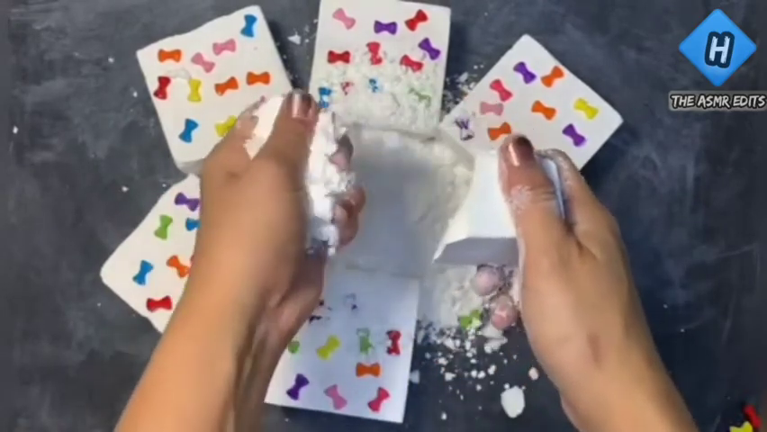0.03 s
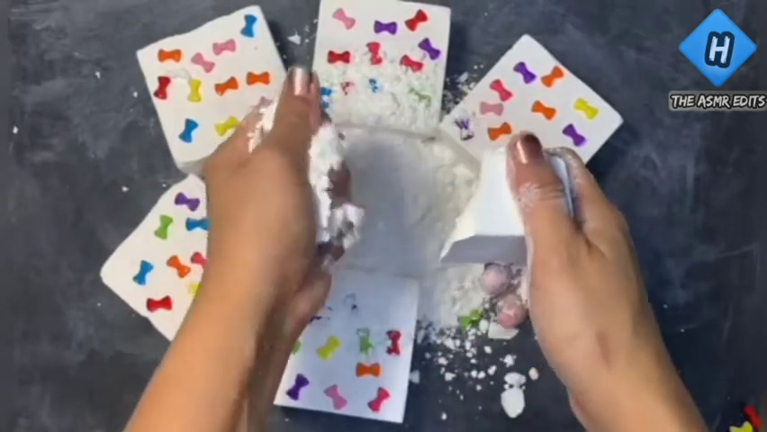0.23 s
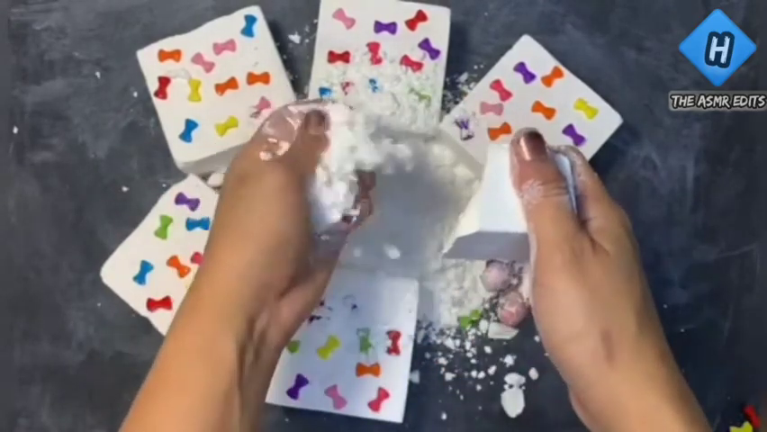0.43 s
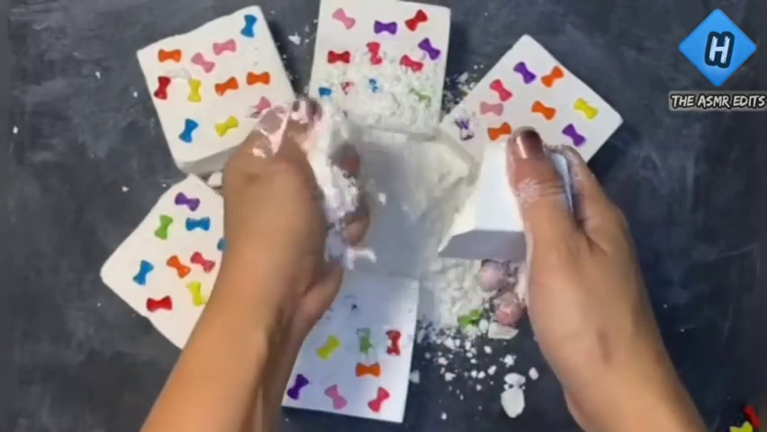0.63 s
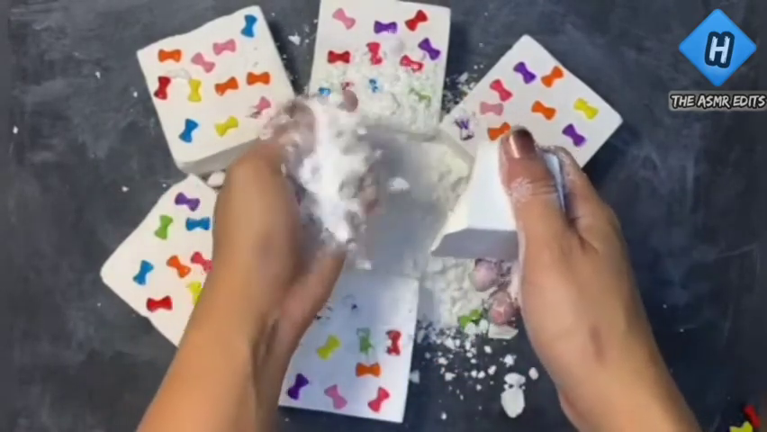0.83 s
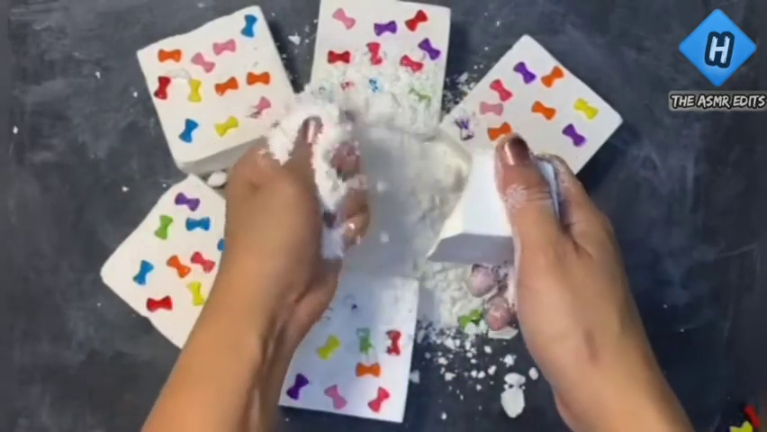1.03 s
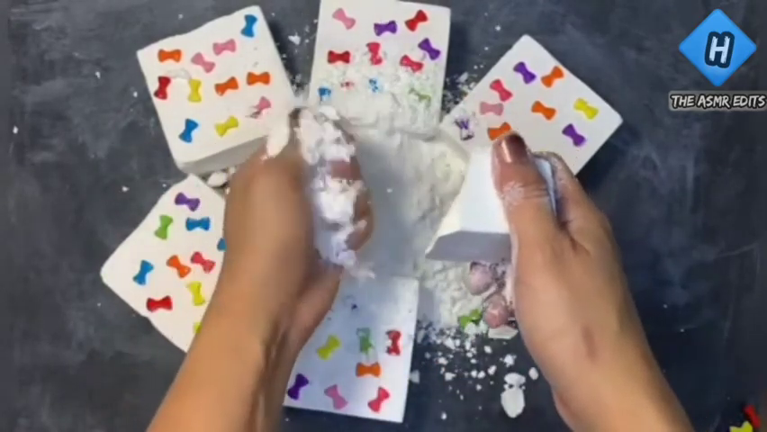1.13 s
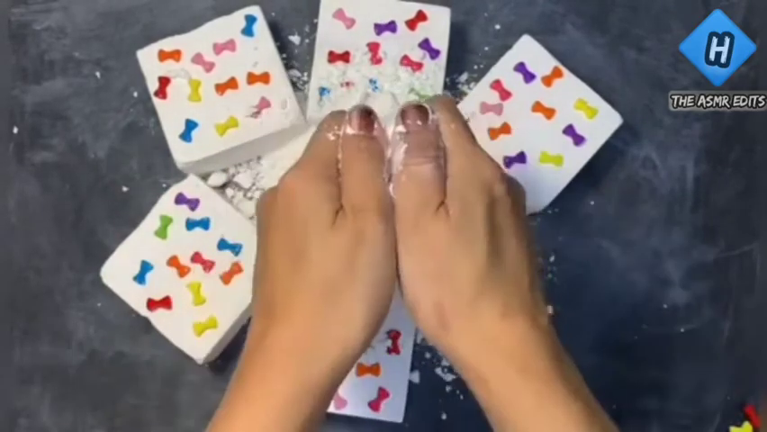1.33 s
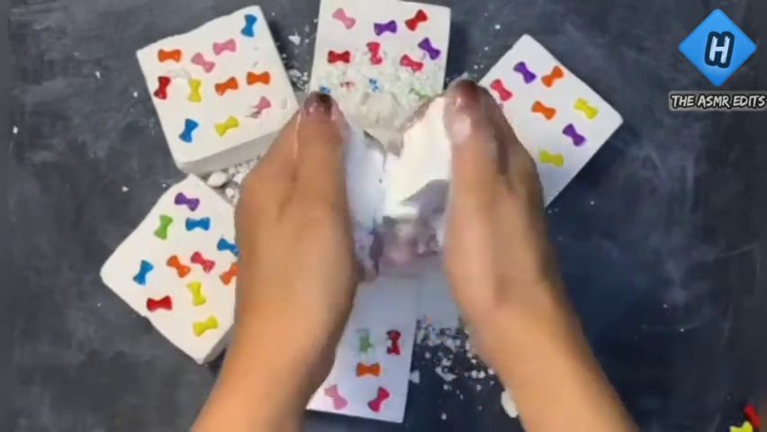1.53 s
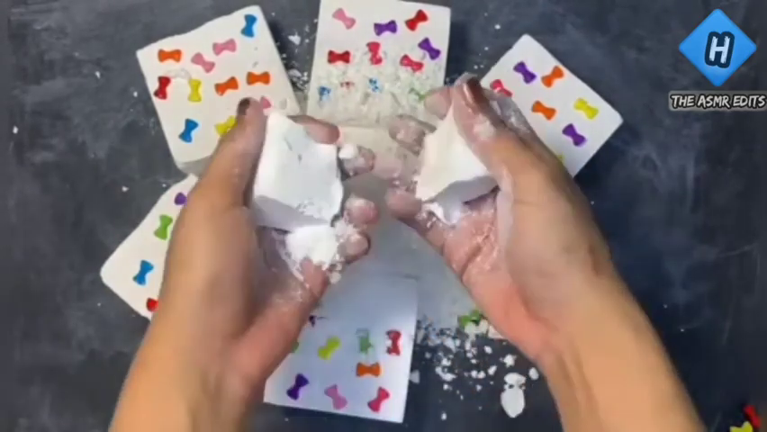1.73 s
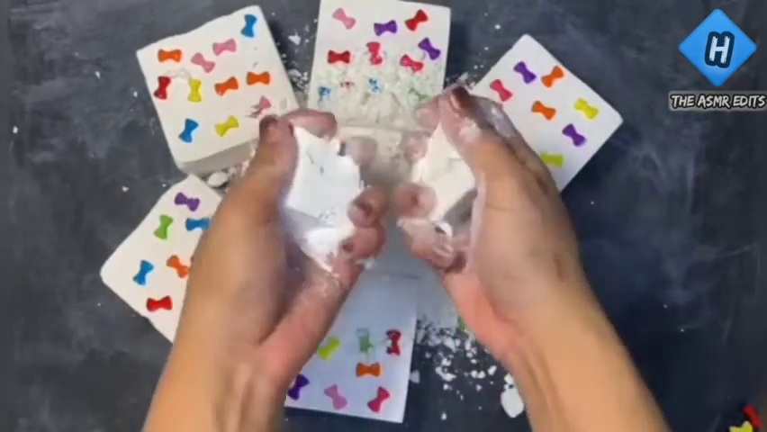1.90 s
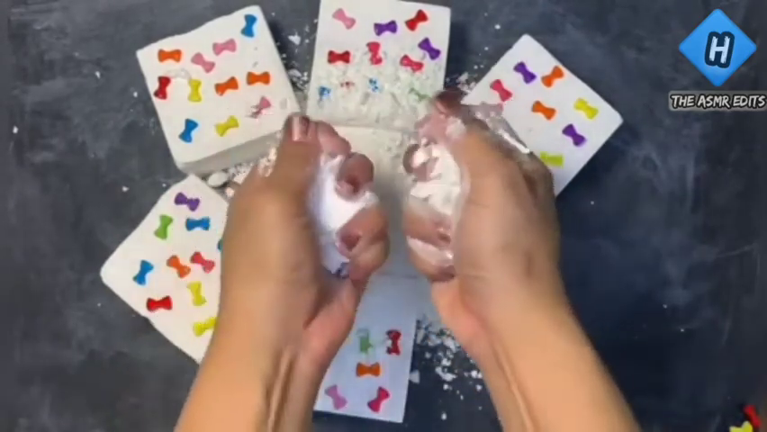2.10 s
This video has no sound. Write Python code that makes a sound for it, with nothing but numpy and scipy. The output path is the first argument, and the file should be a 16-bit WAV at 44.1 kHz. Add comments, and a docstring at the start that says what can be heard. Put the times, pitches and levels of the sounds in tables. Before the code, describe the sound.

Dry chalk crumbles between bare hands in small irregular crackles and gritty crunches. One loud snap follows, then a brief lull and a dense crunchy burst, heard close up in a small room with faint hiss.

```python
"""Dry chalk blocks crack as bare hands crush them above a table in a small room.
Each crack is a short burst of tiny fractures that rings the fragment and thuds in the palms.
The table reflects it, and the room adds a short echo. Powder and crumbs grind between
the fingers, over room hiss and a wavering low rumble."""
import sys
import numpy as np
from scipy import signal
from scipy.fft import rfft, irfft
from scipy.io import wavfile
from scipy.ndimage import uniform_filter1d

SR = 44100
rng = np.random.default_rng(int(sys.argv[2]) if len(sys.argv) > 2 else 0)


def master(y):
    """Save y as 16-bit WAV."""
    cut = np.clip(np.atleast_2d(y).T, -1, 1)
    pcm = np.round(cut * 32767)  # scale
    wavfile.write(sys.argv[1], SR, pcm.astype(np.int16))


N = 95300


def undb(db):
    """Turn decibels (dB) into a number to multiply by."""
    return 10 ** (np.asarray(db, float) / 20)


def unit(x):
    """Scale a signal to an average power of 1."""
    return x / np.sqrt(np.mean(x ** 2) + 1e-18)


def band(x, hz, width_hz):
    """A resonance: keep the pitches near hz and weaken the rest."""
    return signal.lfilter(*signal.iirpeak(min(hz, .45 * SR), max(hz / width_hz, .3), fs=SR), x)


def steep_band(x, hz, width_hz):
    """Three resonances in a row, for a sharper cut on both sides."""
    return band(band(band(x, hz, width_hz), hz, 1.58 * width_hz), hz, 1.58 * width_hz)


def level_curve(table, column):
    """Glide between a table's dB levels, giving one gain per sample."""
    rows = np.array(table, float)
    return undb(np.interp(np.arange(N) / SR, rows[:, 0], rows[:, column]))


def wander(samples):
    """A random drift: noise smoothed over this many samples."""
    return unit(uniform_filter1d(rng.standard_normal(N), samples))


def room_hiss():
    """Steady noise, strongest in the bass."""
    # Each row: frequency in Hz, relative level in dB.
    spectrum = [(41, 0.5), (70, -2), (184, -7), (280, -12.5), (691, -56), (1030, -31), (1600, -34.5),
                (4300, -37), (12400, -52.5), (13500, -71)]
    rows = np.array(spectrum, float)
    hz = np.arange(N // 2 + 1) * SR / N + 1
    shape = undb(np.interp(np.log(hz), np.log(rows[:, 0]), rows[:, 1], left=-40))
    return undb(-47.5) * unit(irfft(rfft(rng.standard_normal(N)) * shape, N))


def rumble():
    """A low tone that wavers in pitch, swells and dips."""
    # Each row: time in seconds, level in dB.
    levels = [(0.0, -48), (0.43, -52.5), (0.49, -40), (0.52, -62), (0.77, -50), (0.88, -45.5), (1.16, -41),
              (1.19, -49.5), (1.31, -43), (1.53, -54.5), (1.63, -39), (1.8, -54), (1.83, -52.5),
              (2.01, -41), (2.03, -57), (2.16, -42.5)]
    pitch_hz = 45.5 + 7.88 * wander(3000)
    cycles = np.cumsum(pitch_hz) / SR
    return level_curve(levels, 1) * np.sqrt(2) * np.sin(2 * np.pi * cycles)


def room_echo(x):
    """The room answers each sound with a tail that gets duller as it fades."""
    # Each row: frequency in Hz, relative level in dB, seconds to fade by 60 dB.
    echo_bands = [(214, -16, 0.64), (543, -48, 1), (1030, -10, 0.16), (1870, -23, 0.43), (4740, -24, 0.11),
                  (8700, -18, 0.24)]
    t = np.arange(SR // 2) / SR
    tail = sum(undb(db - 60 * t / fade_s) * band(rng.standard_normal(len(t)), hz, hz) / 10
               for hz, db, fade_s in echo_bands)
    rise = 1 - np.exp(-t / .001)
    return signal.fftconvolve(x, tail * rise)[:N]


def grinding():
    """Three sizes of grain slip at random moments, with uneven strength, in shared clumps."""
    # Each row: time in seconds, then the levels of coarse crumbs, grit and fine powder in dB.
    levels = [(0, -54, -54.5, -65), (.13, -66, -71, -71), (.27, -60, -59.5, -67.5), (.37, -50, -57, -74),
              (.45, -48, -59, -70), (.56, -71, -69, -72), (.67, -61.5, -65, -72), (.74, -60.5, -56, -77),
              (.89, -61.5, -96, -71), (.925, -42, -59, -72), (1.0, -56, -54.5, -67.5),
              (1.08, -57.5, -54.5, -71), (1.19, -58.5, -72.5, -70), (1.3, -53, -59, -78),
              (1.4, -61.5, -68, -68), (1.465, -56.5, -66.5, -58), (1.56, -62.5, -66.5, -69.5),
              (1.75, -63.5, -79, -69), (1.772, -40, -38, -54), (1.84, -46, -52.5, -58),
              (1.87, -38.5, -42, -44), (1.945, -45, -43.5, -49.5), (1.975, -51.5, -54, -57.5),
              (2.16, -56, -54.5, -65.5)]
    # Each row, coarse to fine: pitch in Hz, band width in Hz, slips per second, strength spread in dB.
    grains = [(420, 700, 1500, 2.), (2200, 2200, 2500, 2.5), (8000, 10000, 4000, 2.5)]
    clumps = undb(1.5 * wander(int(.014 * SR)))
    out = np.zeros(N)
    for column, (hz, width_hz, rate, spread_db) in enumerate(grains, start=1):
        chance, direction, size = rng.random((3, N))
        strength = undb(-spread_db * np.log(1.005 - size))
        slips = (chance < rate / SR) * np.sign(direction - .5) * strength
        scrape = band(band(slips, hz, width_hz), hz, 2 * width_hz)
        swell = undb(1.1 * wander(int(.05 * SR)))  # each grain size also swells by itself
        out += level_curve(levels, column) * unit(clumps * swell * scrape)
    return out


def table_reflection(snaps):
    """A small patch of table sends each crack back a moment later, without its bass."""
    lag = int(.00236 * SR)
    no_bass = signal.lfilter(*signal.butter(2, 400, "high", fs=SR), snaps)
    # Flipped, because the underside of a fragment moves the other way.
    return -undb(-6) * np.concatenate([np.zeros(lag), no_bass[:N - lag]])


def chalk_cracks():
    """Fractures ring the chalk, palms and table. Returns whole cracks, and main fractures alone."""
    # Each row: time in seconds, fragment level in dB, fragment pitch in Hz, levels of thud,
    # crackle and treble tick in dB (before the offsets below), burst length in milliseconds.
    cracks = [(0.127, -68, 1080, -84, -72, -51, 4.9), (0.1568, -59, 2030, -54, -74, -37.5, 6.4),
              (0.2118, -33, 3680, -71, -61, -77, 2.3), (0.2744, -40, 2300, -54.5, -58, -49.5, 2.5),
              (0.3205, -46, 1940, -67, -59, -46.5, 2.5), (0.3505, -51, 2860, -44, -42, -47.5, 3.5),
              (0.3524, -32, 1050, -63, -51, -51, 4.3), (0.366, -39, 1340, -37.5, -43.5, -37.5, 5),
              (0.3686, -31, 1050, -42.5, -37, -73, 3.1), (0.4331, -22.5, 1120, -39, -47, -60, 4.55),
              (0.4554, -47, 1100, -45.5, -62, -73, 10), (0.5027, -24, 1420, -33.5, -33, -49, 2.55),
              (0.6017, -47, 1530, -68, -49, -53, 2.5), (0.6864, -39, 2140, -59, -55, -46.5, 4),
              (0.7087, -32, 3430, -69, -58, -63, 3.9), (0.7244, -40, 2530, -51, -57, -59, 4.2),
              (0.7365, -41, 2530, -63, -52, -49, 3), (0.742, -34.5, 1940, -59, -52, -52, 3.6),
              (0.75, -22.5, 1850, -58, -30, -40.5, 3.55), (0.7662, -31.5, 1690, -74, -37, -48, 2.4),
              (0.8111, -37.5, 2180, -76, -78, -72, 5.8), (0.836, -38, 1920, -68, -73, -68, 3.8),
              (0.8592, -30, 2110, -53, -52, -48, 6.7), (0.8828, -24.5, 2200, -76, -41.5, -42, 5.8),
              (0.9075, -32, 1510, -49, -56, -64, 3.4), (0.918, -18, 1840, -33, -54, -50, 5.47),
              (0.926, -33, 1400, -40, -65, -63, 6.8), (0.9328, -27.5, 1420, -52, -64, -54, 10),
              (1.0281, -40.5, 2280, -54, -76, -55, 3.2), (1.0857, -33.5, 2070, -77, -44, -39.5, 4.24),
              (1.163, -42.5, 2620, -49, -70, -71, 3.8), (1.2107, -8.5, 1970, -15, -29, -26.5, 4.8),
              (1.507, -63, 2400, -72, -54, -54, 4.3), (1.622, -60, 1060, -51, -48, -42, 1.85),
              (1.775, -14.5, 990, -25, -27, -25, 3.6), (1.791, -39, 1020, -50, -53, -56, 3.2),
              (1.8091, -26.5, 1050, -38.5, -32, -44, 2.34), (1.851, -15, 2830, -41, -38.5, -24, 2.67),
              (1.8625, -41, 2850, -41.5, -54, -30, 2.5), (1.8725, -17.5, 2970, -49, -28.5, -34, 2.76),
              (1.8793, -39, 3000, -36, -42, -42, 2.2), (1.8884, -44, 3570, -36, -30.5, -58, 2.9),
              (1.909, -50, 3600, -37, -27, -60, 3.8), (1.9395, -31, 4300, -56, -24.5, -44, 3.93),
              (2.0124, -33.5, 1427, -67, -43, -71, 6.9), (2.034, -36.5, 1170, -60, -49, -61, 6),
              (2.0656, -32, 1820, -43.5, -58, -50, 2.6), (2.1087, -33, 1140, -58, -43, -71, 4.5),
              (2.13, -38, 1110, -65, -47.5, -68, 3.1)]
    shard_count, size = 40, 2048  # size: samples per crack
    lead = .25  # share of the burst before the main fracture
    out = np.zeros((2, N + size))
    draws = rng.random((len(cracks), 2, shard_count))
    for (time_s, db, hz, thud_db, crackle_db, tick_db, ms), (when, push) in zip(cracks, draws):
        span = ms * SR / 1000
        # Tiny shards build up fast before the main fracture and fade more slowly after it.
        fade = np.exp(-1.6 * np.abs(when - lead) * np.where(when < lead, 5, 1))
        burst = np.zeros((2, size))  # row 0 with shards, row 1 without
        np.add.at(burst[0], (when * span).astype(int), undb(-13) * fade * (2 * push - 1))
        burst[:, int(lead * span)] = 1  # the main fracture
        start = int(time_s * SR - .5 * lead * span)
        for part_hz, width_hz, part_db, sign in [
                (hz, .8 * hz, db, 1),  # the fragment rings
                (287, 363, thud_db + 2, 1),  # thud in the palms
                (740, 920, thud_db - 3, -1),  # upper part of the thud
                (236.6, 62, thud_db - 16.5, 1),  # the table top rings on
                (3830, 4210, crackle_db + 10, -1),  # crackle
                (7690, 5970, tick_db + 10, 1)]:  # treble tick
            whole, main = sign * steep_band(burst, part_hz, width_hz)
            shard_gain = undb(3.5 * np.log2(part_hz / 1000))  # shards count more at high pitches
            whole = main + (whole - main) * shard_gain
            whole *= np.linalg.norm(main) / np.linalg.norm(whole)  # same energy as main alone
            gain = undb(part_db) / np.max(np.abs(main))
            out[:, start:start + size] += gain * np.array([whole, main])
    return out[:, :N]


def stereo_spread(x):
    """Smear the treble by a few milliseconds, to make left and right differ."""
    phase = np.cumsum(rng.random(257) * 2.5)
    smeared = signal.fftconvolve(x, irfft(np.exp(-1j * phase)))[:N]
    return signal.sosfilt(signal.ellip(6, .5, 50, 5200, "high", fs=SR, output="sos"), smeared)


def scene():
    """Everything sits in the centre; only the treble spreads, most in the last loud run of cracks."""
    snaps, main_fractures = chalk_cracks()
    snaps = snaps + table_reflection(snaps)
    background = grinding() + room_hiss()
    echo = room_echo(main_fractures)
    centre = snaps + echo + background + rumble()
    t = np.arange(N) / SR
    wide_crumble = (t > 1.78) & (t < 1.935)
    crack_width = undb(np.where(wide_crumble, -2, -25))
    side = stereo_spread(undb(-1) * (background + .5 * echo) + crack_width * snaps)
    return np.array([centre + side, centre - side])


def record(dry):
    """Cut the highest treble, above 13120 Hz."""
    return signal.sosfilt(signal.ellip(10, .2, 75, 13120, fs=SR, output="sos"), dry)


dry = scene()
out = record(dry)
master(out)
```